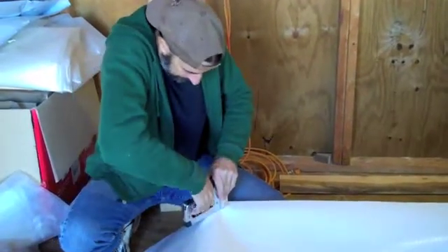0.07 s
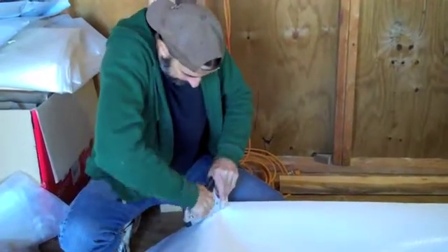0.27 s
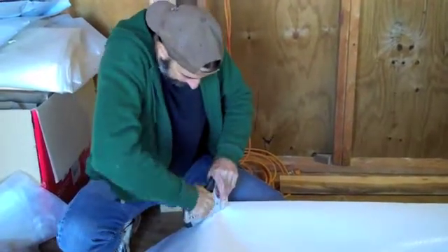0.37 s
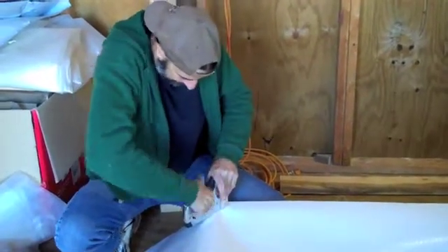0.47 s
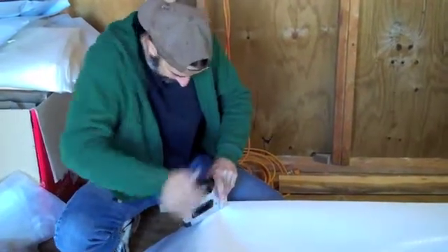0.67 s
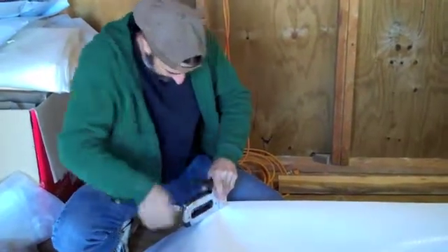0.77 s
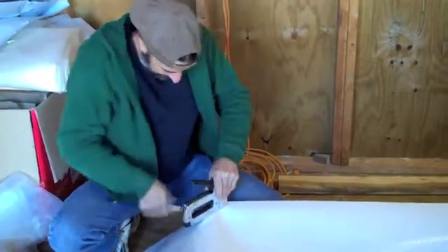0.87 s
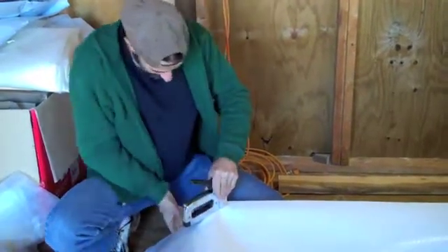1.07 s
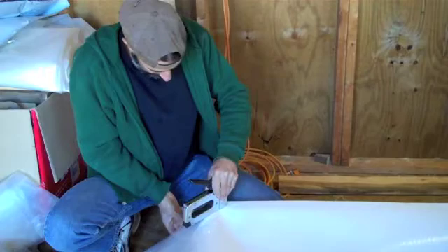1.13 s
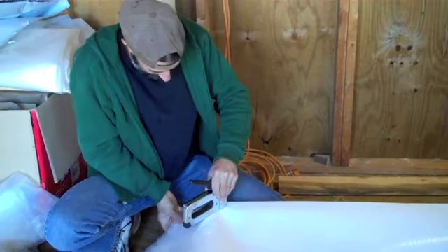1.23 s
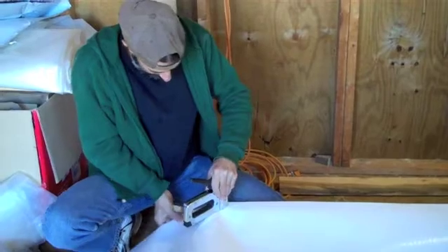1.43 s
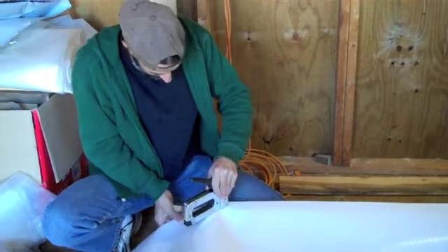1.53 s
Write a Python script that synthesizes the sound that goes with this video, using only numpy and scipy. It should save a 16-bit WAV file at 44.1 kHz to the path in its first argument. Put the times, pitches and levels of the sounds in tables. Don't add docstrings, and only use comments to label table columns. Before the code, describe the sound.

A hand staple gun fires once with a hard, loud snap, then its lever rattles back.

```python
import sys
import numpy as np
from scipy import signal
from scipy.fft import rfft, irfft
from scipy.io import wavfile
from scipy.ndimage import uniform_filter1d

SR = 44100
rng = np.random.default_rng(int(sys.argv[2]) if len(sys.argv) > 2 else 0)


def transcribe(signal):
    frames = np.atleast_2d(signal).T
    limited = np.clip(frames, -1, 1)
    pcm = np.round(limited * 32767).astype(np.int16)
    wavfile.write(sys.argv[1], SR, pcm)


def makeup_ratio(level_db):
    decades = np.asarray(level_db, float) / 20
    return 10 ** decades


N = 70560

# start in seconds, level in dB, burst t60 in seconds.
BLOWS = [
    (0.238, -9.5, 0.017),
    (0.2434, -4, 0.022),
    (.2470, -2, 0.01),
    (0.2491, -0.5, 0.013),
    (0.2543, -5, .025),
    (0.2623, -13, 0.015),
]


def evened(x):
    return x / np.sqrt(np.mean(x ** 2) + 1e-20)


def read(points, hz):
    f, value = np.transpose(points)
    return np.interp(np.log(hz + 1), np.log(f + 1), value)


def along(curve, column=1):
    return np.interp(np.arange(N) / SR, *np.transpose(curve)[[0, column]])


def coloured(x, gain):
    hz = np.linspace(0, SR / 2, 513)
    kernel = signal.firwin2(257, hz, gain(hz) * (hz < SR / 2), fs=SR)
    return signal.oaconvolve(x, kernel, "same")


def shade(points):
    return lambda hz: makeup_ratio(read(points, hz))


def add(mix, s, sound):
    part = mix[round(s * SR):][:len(sound)]
    part += sound[:len(part)]


def resonate(x, hz, width_hz):
    turn = np.exp(2j * np.pi * np.cumsum(hz * np.ones(len(x))) / SR)
    r = np.exp(-np.pi * width_hz / SR)
    return 2 * (turn * signal.lfilter([1 - r], [1, -r], x / turn + 1e-18)).real


def ring(modes, rise_s):
    flutter, flutter_s = 0.6, 0.016
    t = np.arange(SR // 2) / SR
    noise = rng.standard_normal((len(modes), len(t)))
    waver = uniform_filter1d(noise, round(flutter_s * SR), axis=1)
    total = np.zeros(len(t))
    for (hz, db, t60), w in zip(modes, waver):
        level = makeup_ratio(db - 60 * t / t60) * (1 + flutter * evened(w))
        total += level * np.sin(2 * np.pi * (hz * t + rng.random()))
    return (1 - np.exp(-t / rise_s)) * total


def grains(per_s, spread_db):
    size = makeup_ratio(spread_db * np.minimum(rng.exponential(1, N), 4))
    return evened(rng.standard_normal(N) * size * (rng.random(N) < per_s / SR))


def pair(a, b, likeness):
    def same(hz):
        return np.clip(read(likeness, hz), 0, 1)

    left = coloured(a, lambda hz: np.ones_like(hz))
    right = coloured(a, same) + coloured(b, lambda hz: np.sqrt(1 - same(hz) ** 2))
    return np.array([left, right])


def air():
    # frequency in Hz, level in dB per Hz.
    spectrum = [(40, -8), (150, -2), (270, -6.5), (700, -9.5), (1600, -14.5), (4000, -18), (7000, -21),
                (14000, -22.5)]
    # frequency in Hz, left-right likeness from 0 to 1.
    likeness = [(60, 0.64), (230, 0.45), (900, 0.87), (3480, 0.16), (13500, 0.045)]
    noise = pair(*rng.standard_normal((2, N)), likeness)
    gain = makeup_ratio(read(spectrum, np.fft.rfftfreq(N, 1 / SR)))
    return makeup_ratio(-61) * evened(irfft(rfft(noise) * gain, N))


def echoes(x):
    # frequency in Hz, t60 in seconds.
    decay = [(100, 0.5), (300, 0.47), (1000, 0.49), (3000, 0.45), (6000, 0.28), (9000, 0.26), (13000, 0.17)]
    # frequency in Hz, left-right likeness.
    likeness = [(150, 0.98), (400, 1), (1000, 0.097), (4000, 0.13), (10000, 0.18)]
    first_echo_s = 0.005
    taps = rng.standard_normal((2, SR)) * (rng.random((2, SR)) < 0.15)
    hz, t, z = signal.stft(pair(*taps, likeness), SR, nperseg=256)
    fade = makeup_ratio(-60 * t / read(decay, hz)[:, None])
    tail = signal.istft(z * fade, SR, nperseg=256)[1]
    tail = tail * (np.arange(tail.shape[1]) > first_echo_s * SR)
    return signal.fftconvolve(x[None], tail / np.linalg.norm(tail[0]), axes=1)[:, :N]


def shed(x):
    turn_s = 0.009
    turn = np.pi / 2 * np.arange(N) / SR / turn_s
    return echoes(x * np.cos(turn)) + echoes(x * np.sin(turn))


def early(x):
    taps = np.zeros((2, 2048))
    delay_s = np.geomspace(0.00034, 0.0074, 8) * rng.uniform(0.8, 1.2, (2, 8))
    at = (SR * delay_s).astype(int)
    np.put_along_axis(taps, at, makeup_ratio(-13) * rng.choice([-1., 1.], at.shape), 1)
    bright = signal.lfilter(*signal.butter(1, 560, "high", fs=SR), x)
    return signal.oaconvolve(bright[None], taps, axes=1)[:, :N]


def sheet():
    # time in seconds, level in dB.
    crinkle = [(0, -48.5), (.02, -54.5), (.045, -60.5), (.12, -60), (.2, -52.5), (.5, -51.5), (.75, -66),
               (.9, -66), (.95, -62.5), (1.08, -64), (1.1, -63), (1.16, -64), (1.175, -57.5), (1.22, -61.5),
               (1.27, -61.5), (1.33, -69.5), (1.4, -68.5), (1.6, -72.5)]
    # frequency in Hz, level in dB per Hz.
    plastic = [(200, -5.5), (400, -2.5), (1000, -10.5), (2500, -6.5), (4500, -5.5), (6200, -3.5),
               (9000, -16), (14000, -33)]
    # time in seconds, level in dB, hollow pitch in Hz, hollow share in dB.
    slide = [
        (.92, -87, 1200, -2),
        (.98, -67.5, 1370, -2),
        (1.04, -64, 1700, -1),
        (1.08, -63.5, 1900, -1),
        (1.1, -69, 1870, -2),
        (1.125, -62, 1950, -8),
        (1.15, -69, 1800, -5),
        (1.2, -59, 1800, -14),
        (1.3, -78, 1800, -20),
    ]
    crackle = makeup_ratio(along(crinkle)) * evened(coloured(grains(12000, 2.5), shade(plastic)))
    rub = grains(9000, 2.094)
    hollow = evened(resonate(rub, along(slide, column=2), width_hz=280))
    wide = evened(signal.lfilter(*signal.butter(2, [300, 4000], "band", fs=SR), rub))
    n = np.arange(N)
    sliding = makeup_ratio(along(slide)) * (n > slide[0][0] * SR) * (n < slide[-1][0] * SR)
    return crackle + sliding * (makeup_ratio(along(slide, column=3)) * hollow + makeup_ratio(3) * wide)


def bumps():
    # start in seconds, level in dB, hollow pitch in Hz.
    knocks = [(.455, -39.5, 195), (0.512, -44, 303), (.538, -42, 719), (0.55, -43, 300.4),
              (.552, -44.5, 450), (0.585, -48.5, 273), (.588, -45, 650), (0.651, -52, 271.4),
              (1.2124, -44, 264), (1.2340, -47, 180.2), (1.259, -51.5, 260), (1.285, -54.5, 169.6),
              (1.312, -66, 248.3)]
    # frequency in Hz, level in dB per Hz.
    dull = [(100, -5), (170, -1), (300, -1.5), (700, -1), (1200, -15.5), (3000, -52.5)]
    t60, rise_s, width_hz = 0.11, 0.0045, 70
    out, t = np.zeros(N), np.arange(8192) / SR
    for (s, db, hz), z in zip(knocks, rng.standard_normal((len(knocks), 8192))):
        thud = irfft(rfft(z) * makeup_ratio(read(dull, np.fft.rfftfreq(len(z), 1 / SR))))
        hollow = resonate(resonate(z, hz, width_hz), hz, width_hz)
        knock = evened(hollow) + makeup_ratio(-5) * evened(thud)
        add(out, s, knock * np.minimum(t / rise_s, 1) * makeup_ratio(db - 60 * t / t60))
    return out


def drag():
    # time in seconds, level in dB.
    motion = [
        (.465, -90),
        (.470, -42),
        (.49, -40.5),
        (.512, -40.5),
        (.53, -42),
        (.55, -46),
        (.6, -53),
        (.7, -89),
    ]
    # frequency in Hz, level in dB per Hz.
    scrape = [(300, -2.5), (900, -6.5), (2000, -5), (4000, -0.5), (5600, -10), (8000, -12.5), (9500, -18),
              (14000, -38)]
    # pitch in Hz, width in Hz, level in dB.
    spring = [(5400, 340, -1), (5800, 340, 0), (7500, 700, -9)]
    wander, patchy_db, slip_s = 0.025, 4, 0.004
    ticks, t = grains(20000, 1.2), np.arange(N) / SR
    bend, patch = (evened(uniform_filter1d(z, round(slip_s * SR))) for z in rng.standard_normal((2, N)))
    sing = np.zeros(N)
    for hz, width_hz, db in spring:
        sing += makeup_ratio(db) * evened(resonate(ticks, hz * (1 + wander * bend), width_hz))
    moving = makeup_ratio(along(motion)) * (t > motion[0][0]) * (t < motion[-1][0])
    return moving * (evened(coloured(ticks, shade(scrape))) + evened(sing * makeup_ratio(patchy_db * patch)))


def clicks():
    # start in seconds, level in dB, ring pitch in Hz, burst t60 in seconds.
    taps = [(.001, -54, 10000, .2), (0.0148, -41.5, 6000, 0.02), (0.2073, -35.5, 6040, 0.029),
            (0.2114, -32, 2700, 0.017), (.2208, -26, 11000, 0.012), (0.2205, -23, 1830, .02),
            (0.2204, -19, 4360, 0.021), (0.2224, -28.5, 950, .03), (0.2214, -32.5, 380, .04),
            (.2208, -9.5, 6100, .014), (0.221, -15.5, 2900, 0.018), (0.2277, -22.5, 8000, 0.023),
            (0.229, -22, 6000, .02), (0.2387, -5, 4850, .03), (0.238, -12.5, 7900, .015),
            (0.2453, -4, 6907, .015), (0.2476, -3.5, 5890, .03), (.2525, -11, 2565, .025),
            (.4675, -28.5, 5400, 0.024), (0.5012, -29, 5670, .025), (.5265, -33.5, 5640, .03),
            (0.5131, -30, 7540, 0.04), (0.514, -28.5, 5630, 0.02), (.5130, -28, 2170, 0.018),
            (0.515, -31, 3830, .015), (0.5145, -33, 1100, .035), (1.1220, -50, 3000, 0.054),
            (1.1660, -56, 6120, .03), (1.204, -52, 5500, .015), (1.2025, -41, 2110, 0.015),
            (1.218, -61, 892, 0.032), (1.2340, -58.5, 723, 0.01067)]
    rise_s = 0.0009
    out, t = np.zeros(N), np.arange(2048) / SR
    for (s, db, hz, t60), z in zip(taps, rng.standard_normal((len(taps), 2048))):
        width_hz = 0.3 * hz
        tone = evened(resonate(resonate(z, hz, width_hz), hz, width_hz)) + makeup_ratio(-13) * z
        add(out, s, tone * np.minimum(t / rise_s, 1) * makeup_ratio(db - 60 * t / t60))
    return out


def ringing():
    # pitch in Hz, level in dB, t60 in seconds.
    steel = [(1558, -6, .22), (1584, -4, .22), (2159, -9, .3), (2460, -7, .28), (2519, -3, .3),
             (3031, -9, .3), (3058, -1, .38), (3119, -7, .33), (3137, -3, .36), (3731, -9, .3),
             (4538, -8, .23), (4856, -8, .25), (5921, -3, .15), (7477, -8, .2)]
    board = [(130, -4, 0.35), (160, -4, .35), (192, -6, .5), (234, 2, .33), (250, 2, .25), (271, -1, 0.28),
             (438, -14, .2), (524, -2, 0.28), (555, -10, .35), (730, -6, 0.18), (900, -8, 0.25),
             (985, -1, .12), (1250, -6, .25), (1479, -5, .12)]
    out = np.zeros(N)
    struck = makeup_ratio(-23.5) * ring(steel, rise_s=0.0009) + makeup_ratio(-24) * ring(board, rise_s=0.008)
    add(out, BLOWS[1][0], struck)
    return out


def low_push():
    out = np.zeros((2, N))
    for ch, db in zip(out, (-23, -36)):
        add(ch, 0.243, makeup_ratio(db) * np.hanning(round(0.013 * SR)))
    return out


def slam():
    # frequency in Hz, level in dB per Hz.
    crack = [(100, -9.5), (250, -11.5), (1000, -8), (2600, -7.5), (4800, -7), (7000, -13.5), (9500, -16.5),
             (14000, -25)]
    rise_s = 0.00031
    out, t = np.zeros(N), np.arange(4096) / SR
    for (s, db, t60), z in zip(BLOWS, rng.standard_normal((len(BLOWS), 4096))):
        burst = evened(coloured(z, shade(crack)))
        add(out, s, burst * np.minimum(t / rise_s, 1) * makeup_ratio(db - 60 * t / t60))
    return out


def scene():
    near = sheet() + bumps() + drag() + clicks() + slam()
    low_cut = signal.butter(4, 115, "high", fs=SR, output="sos")
    near, rings = signal.sosfilt(low_cut, [near, ringing()])
    sent = near + makeup_ratio(-8) * rings
    return near + rings + early(sent) + makeup_ratio(-6.5) * shed(sent) + air() + low_push()


def low_pass(x):
    return signal.sosfilt(signal.butter(12, 14090, fs=SR, output="sos"), x)


def record(dry):
    # frequency in Hz, left minus right in dB.
    balance = [(100, 0), (500, 1.5), (3000, -0.5), (5700, -3), (7000, 7.5), (9000, 6), (11000, 6.5),
               (14000, 5)]
    # pitch in Hz, width in Hz, level in dB.
    port_rings = [(7830, 970, -0.5), (6020, 620, -2.5)]
    ceiling, left_lag = 0.95, 1
    ports = []
    for ch, side, (hz, width_hz, db) in zip(dry, (1, -1), port_rings):
        rung = ch + makeup_ratio(db) * resonate(ch, hz, width_hz)
        ports.append(coloured(rung, lambda f: makeup_ratio(side * read(balance, f) / 2)))
    ports = np.array([np.roll(ports[0], left_lag), ports[1]])
    held = ports / (1 + (abs(ports) / ceiling) ** 6) ** (1 / 6)
    edge = signal.firwin(255, 14300, window=("kaiser", 4), fs=SR)
    return low_pass(signal.oaconvolve(held, edge[None], "same"))


dry = scene()
out = record(dry)
transcribe(out)
```